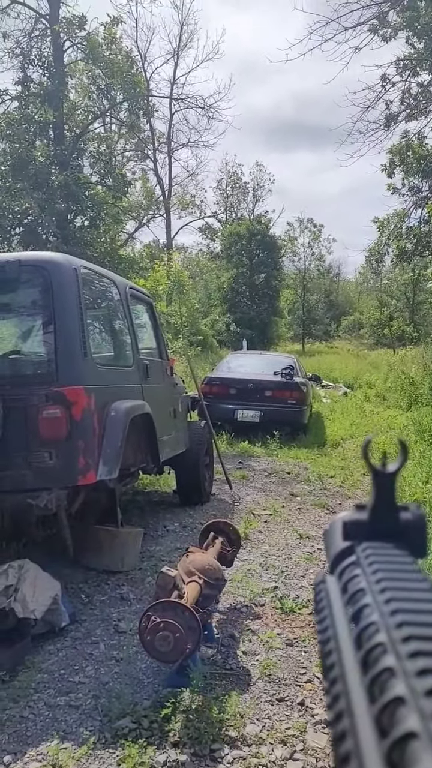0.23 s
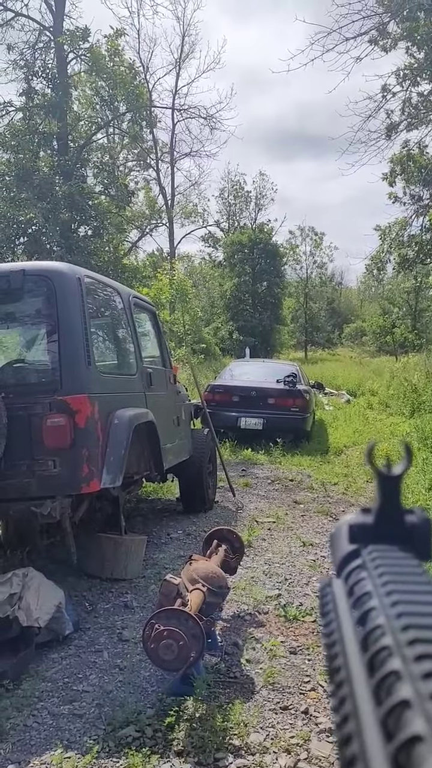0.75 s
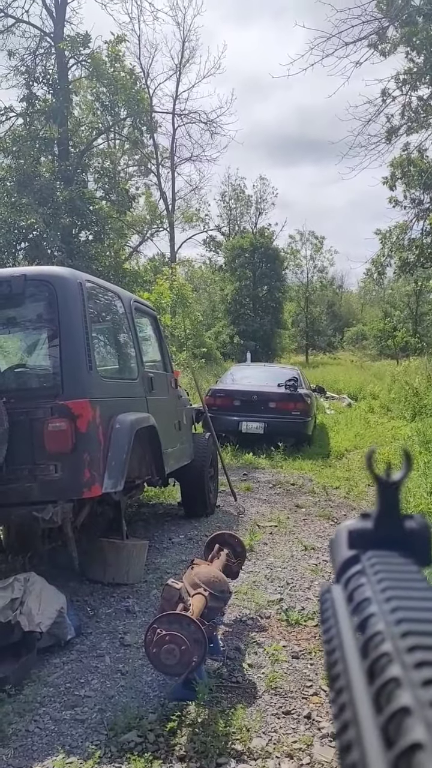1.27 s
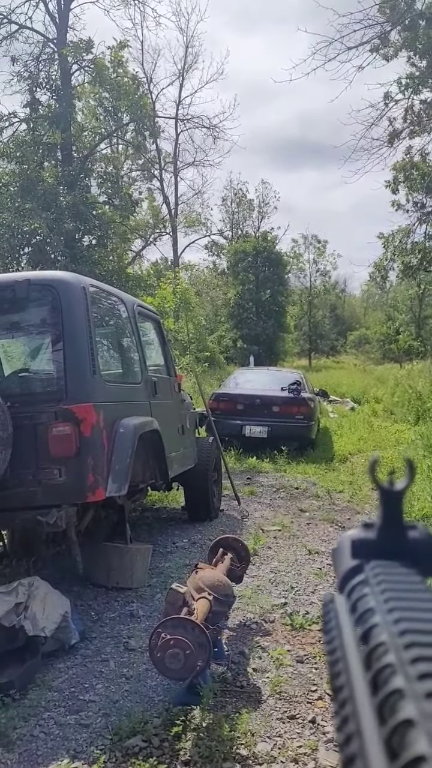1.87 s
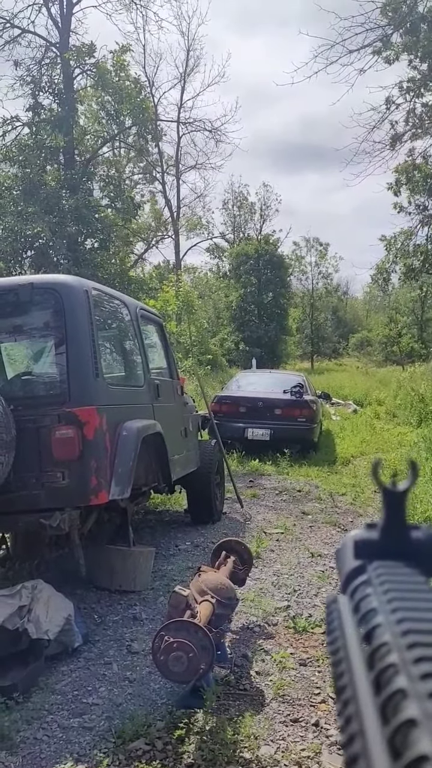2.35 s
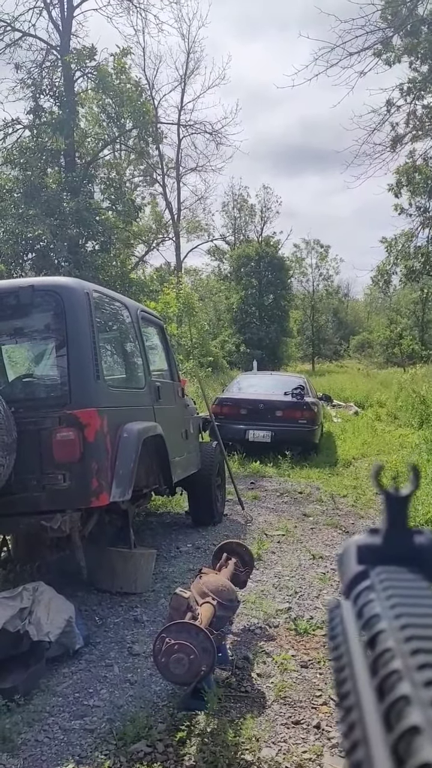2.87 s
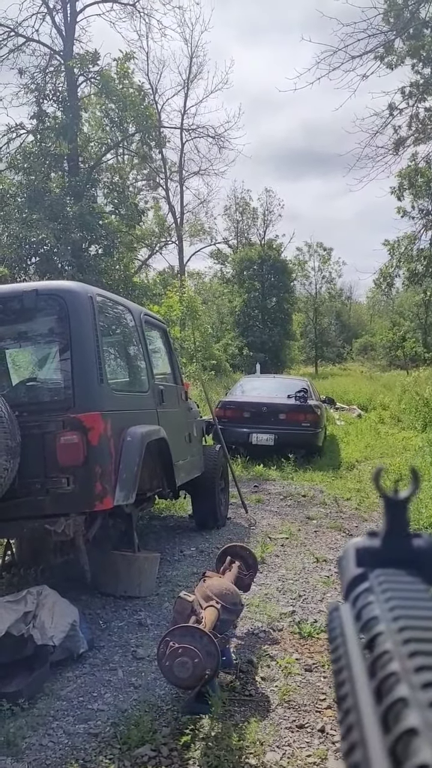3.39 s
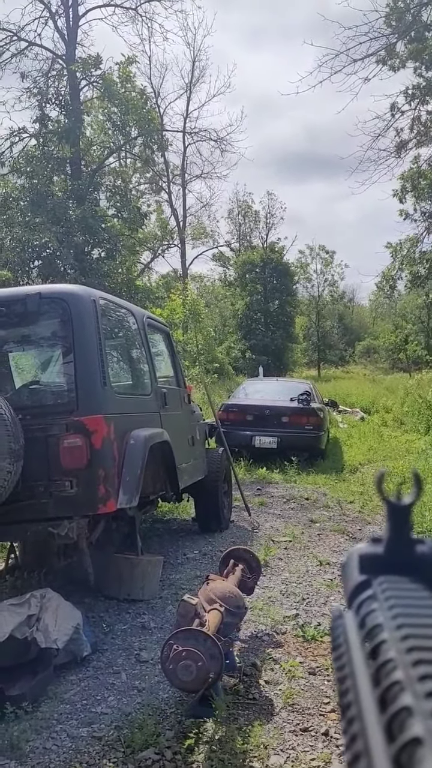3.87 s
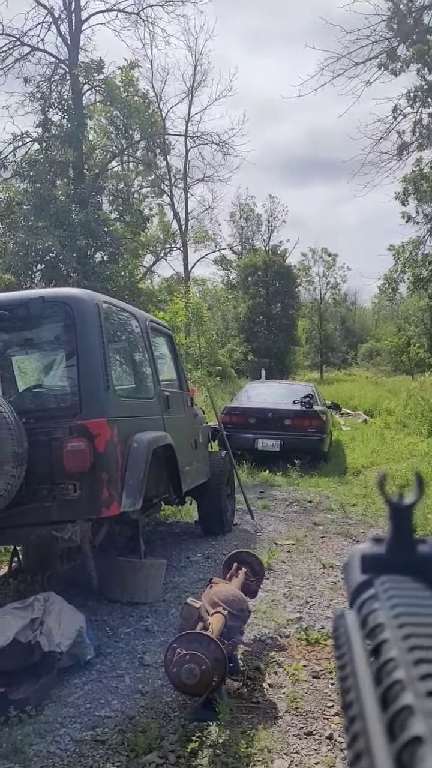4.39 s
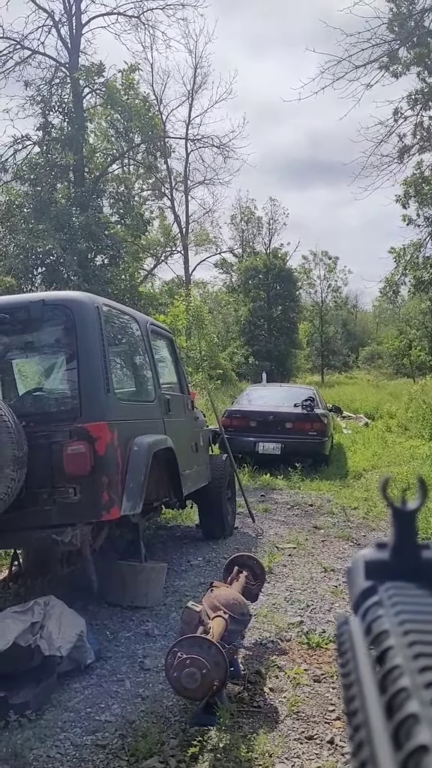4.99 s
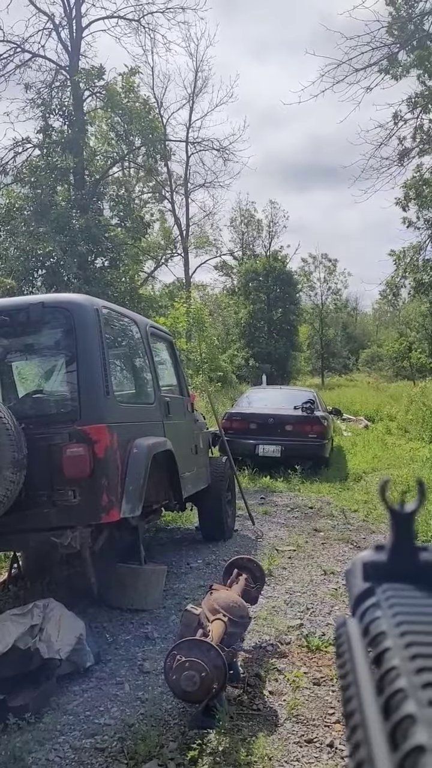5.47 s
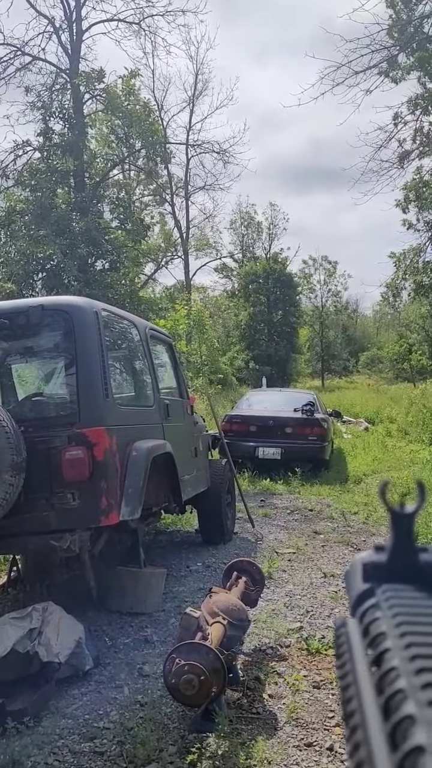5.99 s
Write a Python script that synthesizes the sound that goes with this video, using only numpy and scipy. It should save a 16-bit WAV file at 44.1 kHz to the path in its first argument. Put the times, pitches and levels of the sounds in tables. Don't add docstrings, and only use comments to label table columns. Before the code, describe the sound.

In a quiet yard with faint low hum and leaves, an electric airsoft rifle is handled right beside a phone's microphones. A latch clicks at the very start, then near silence. At 0.4 seconds the motor whirrs up and a dry pop snaps at 0.47; the gears coast down and click. Another single shot comes at 1.04, followed by a brief whirr and sharp click at 1.26. A pair pops at 1.67 and 1.78. From 2.5 to 3.25 a rapid six-shot string chatters, gears grinding and whining between pops. After a pause with tiny ticks, a similar string runs from 3.67 to 4.4, with another shot at 4.52 and latch clatter. From 5.0 to 5.8 six more fire slightly less evenly, then single shots at 5.89 and 6.19. Each pop has a thump, plastic ring and short scattered echo; small wind puffs bump the left side.

```python
import sys
import numpy as np
from scipy import signal
from scipy.fft import rfft, irfft
from scipy.io import wavfile
from scipy.ndimage import uniform_filter1d

SR = 44100
rng = np.random.default_rng(int(sys.argv[2]) if len(sys.argv) > 2 else 0)


def to_wav(s):
    ch = np.atleast_2d(s).T
    pcm = np.round(np.clip(ch, -1, 1) * 32767)
    wavfile.write(sys.argv[1], SR, pcm.astype(np.int16))


def natural_amplitude(level_db):
    exponent = np.asarray(level_db, float) / 20
    return 10 ** exponent


N = 275625
T = np.arange(N) / SR

# start in seconds, peak in dB, thump in dB.
SHOTS = [(0.466, -1.5, -3), (1.0376, -3, 4), (1.6712, -1, -3), (1.7799, -3.5, 3.5), (2.5727, -3, 1),
         (2.6864, -4.5, -6), (2.798, -3.5, -3), (2.9123, -3.5, -2), (3.0241, -3, -2), (3.1329, -3.5, -2),
         (3.7628, -2.5, -4.5), (3.882, -3.5, -10), (3.997, -3.5, -3.5), (4.11, -3, -5.5), (4.2236, -4, -5),
         (4.3358, -3, 2), (4.5189, -4, 1), (5.1006, -3, -1), (5.2075, -5, 0), (5.3168, -4.5, 1.5),
         (5.428, -3.5, -5.5), (5.5418, -5.5, 2.5), (5.676, -5, 2.5), (5.894, -4.5, 1), (6.1853, -4.5, -2)]
# start and end in seconds, rattle at the right port in dB, treble in dB,
# sag while coasting in dB.
PULLS = [(0.382, 0.579, -17, -19, 1), (1.003, 1.168, -15, -16, -17), (1.156, 1.208, -17.5, -18, 6),
         (1.592, 1.887, -17.5, -18.5, -7), (2.509, 3.25, -21.5, -17.5, -6.5),
         (3.667, 4.442, -21.5, -18, -2), (4.45, 4.628, -22, -15, -9), (5.002, 5.791, -23, -17, -6.5),
         (5.781, 5.998, -22.5, -20.5, 2), (6.131, 6.299, -23.5, -16, 2.5)]
SHOT_S = np.array(SHOTS)[:, 0]
POP_S = SHOT_S + 0.0014
GRIP_REST_DB = -4.5


def colour(x, table):
    hz, db = np.transpose(table)
    f = np.arange(x.shape[-1] // 2 + 1) * SR / x.shape[-1] + 1
    gain = natural_amplitude(np.interp(np.log(f), np.log(hz), db))
    return irfft(rfft(x) * gain, x.shape[-1])


def unit(x):
    return x / np.sqrt(np.mean(x ** 2))


def walk(rate):
    hold = int(SR / rate)
    steps = np.repeat(rng.standard_normal(N // hold + 1), hold)
    return 1.46 * uniform_filter1d(steps, hold)[:N]


def ring(x, hz, width):
    return signal.lfilter(*signal.iirpeak(hz, hz / width, SR), x)


def add(out, s, sound):
    i = int(round(s * SR))
    sound, i = sound[:, max(-i, 0):], max(i, 0)
    out[:, i:i + sound.shape[1]] += sound[:, :N - i]


def grip():
    # time in seconds, left minus right in dB.
    shading = [(0, -3), (1.3, -4), (2.5, -6), (4.2, -3.5), (4.26, -11.5), (5.0, -12.5), (6.25, -12)]
    return np.interp(T, *np.transpose(shading))


def ports(near, other, alike, pan_db):
    lag = 14
    alike = np.clip(alike, 0, 1)
    left = alike * np.roll(near, lag) + np.sqrt(1 - alike ** 2) * other
    return np.array([left * natural_amplitude(pan_db), near])


def shots():
    # time from the pop in ms, pitch in Hz, length in ms, left gain, right gain.
    puffs = [(-7.9, 200, .8, -.07, -.1), (-6.2, 160, 1.2, .11, .17), (0, 2500, .24, .45, .15),
             (.19, 2550, .3, -.2, -.75), (0, 6500, .07, .46, .32), (.45, 5000, .14, -.2, .12),
             (2.25, 1150, .55, -.08, -.36), (3.0, 1100, .7, .15, .03), (7.9, 3000, .15, .2, .02),
             (13.6, 2500, .2, -.12, .16), (18.3, 2600, .5, .05, -.22), (-4.6, 480, 1.2, -.04, -.06),
             (31, 450, .8, .03, .05), (31.5, 1500, .5, .05, .1), (7.5, 830, 2.8, .05, .075),
             (.1, 12000, .05, .16, .12)]
    # pitch in Hz, level in dB, t60 in seconds.
    body_modes = [(67, -31.5, 0.13), (142, -32, 0.082), (270, -44.5, 0.33), (316, -35.5, 0.11),
                  (500, -20, 0.03), (850, -19, 0.04), (980, -24, 0.03), (1300, -16, 0.028)]
    out, ms = np.zeros((2, N)), np.arange(-441, 8000) / SR * 1000
    shade_db = grip()
    late = np.maximum(ms - 1.6, 0) / 1000
    for (s, db, thump_db), pop_s, vary in zip(SHOTS, POP_S, rng.standard_normal((len(SHOTS), 20))):
        pop = 0
        for (at, hz, length, left, right), v in zip(puffs, vary):
            wave = np.cos(2 * np.pi * hz * (ms - at) / 1000) * np.exp(-((ms - at) / length) ** 2)
            early_db = thump_db if at < -1 else 0
            pop = pop + natural_amplitude(0.7 * v + early_db) * np.outer([left, right], wave)
        body = 0
        for (hz, mode_db, t60), v in zip(body_modes, vary[10:]):
            tone = np.sin(2 * np.pi * hz * (1 + 0.043 * v) * late)
            body = body + natural_amplitude(mode_db + 2 * v) * tone * 1000 ** (-late / t60)
        pop[0] *= natural_amplitude(0.051 * (shade_db[int(s * SR)] - 3.0))
        both = pop + ports(body, np.roll(body, 140), 1.0, -3.0)
        add(out, pop_s - 441 / SR, natural_amplitude(db + 3.5) * both)
    return out


def pulls():
    # seconds after the start, rattle in dB, treble in dB.
    start = [
        (0, -49.5, -6.5),
        (.008, -10.5, -12),
        (.026, 1, -6.5),
        (.07, 0.5, -1),
        (.12, 1, 0),
    ]
    # seconds before the end, rattle in dB, treble in dB.
    stop = [
        (0, -41.5, 4.5),
        (.008, -8.5, -2.5),
        (0.031, 0.5, 0),
    ]
    level_db, treble_db = np.full(N, -90.), np.zeros(N)
    s0, up_db, up_treble = np.transpose(start)
    s1, down_db, down_treble = np.transpose(stop)
    for t0, t1, db, high_db, sag_db in PULLS:
        on = (T >= t0) & (T < t1)
        t, last = T[on], max(SHOT_S[SHOT_S < t1][-1], t0)
        edges_db = np.interp(t - t0, s0, up_db) + np.interp(t1 - t, s1, down_db)
        level_db[on] = db + edges_db + np.interp(t, [last, t1], [0, sag_db])
        treble_db[on] = high_db + np.interp(t - t0, s0, up_treble) + np.interp(t1 - t, s1, down_treble)
    cupped_db = GRIP_REST_DB - grip()
    return level_db + 0.99 * cupped_db, treble_db - 0.62 * cupped_db


def spins():
    # start in seconds, start, middle and end in Hz, level in dB.
    windups = [(.405, 850, 1140, 1130, -22), (1.173, 860, 900, 870, -27), (1.603, 820, 1150, 1210, -23),
               (2.533, 860, 1030, 1050, -25), (3.683, 830, 1200, 1120, -25), (4.483, 900, 1030, 1060, -22),
               (5.016, 820, 1310, 1240, -21.5), (5.583, 1330, 1430, 1150, -23),
               (5.812, 880, 1370, 1330, -22.5), (6.148, 700, 880, 930, -27.5)]
    # start in seconds, middle and end in Hz, level in dB.
    coasts = [(.49, 1800, 650, -24.5), (1.8, 1300, 850, -29), (4.37, 1300, 600, -31),
              (5.94, 1400, 500, -25)]
    free_hz, slack_s, stall_s, coast_slack_s = 1900, .008, .02, .014
    ends = np.array(PULLS)[:, 1]
    after = lambda times, s: times[times > s][0]
    arcs = []
    for s, *arc in windups:
        arcs.append((s, min(after(POP_S, s) - slack_s, after(ends, s) - stall_s), *arc))
    for s, *arc in coasts:
        arcs.append((s, after(ends, s) - coast_slack_s, free_hz, *arc))
    return arcs


def strokes(level_db):
    # seconds after a shot, seconds before the next, start, middle and end in Hz, dB over the rattle.
    stroke = (.028, .007, 1900, 1690, 1280, -6.5)
    after_s, before_s, start_hz, middle_hz, end_hz, over_db = stroke
    usual_s, law = .113, 1.4
    arcs = []
    for a, b in zip(POP_S, POP_S[1:]):
        if b - a < 1 / 8:
            lift = (usual_s / (b - a)) ** law
            db = over_db + level_db[int((a + b) / 2 * SR)]
            arcs.append((a + after_s, b - before_s, start_hz, middle_hz * lift, end_hz * lift, db))
    return arcs


def whine(level_db):
    # pitch in Hz, width in Hz, gain.
    overtone_panels = [(2030, 140, 4), (3200, 200, .7), (4300, 200, 3.5)]
    mesh, overtones, wobble = np.zeros(N), np.zeros(N), 1 + .008 * walk(150)
    for t0, t1, a, m, b, db in spins() + strokes(level_db):
        i = slice(int(t0 * SR), int(t1 * SR))
        u = np.linspace(0, 1, len(wobble[i]))
        u = u ** (.7 if m > a + 200 else 1)
        hz = a + (4 * m - 3 * a - b) * u + 2 * (a + b - 2 * m) * u ** 2
        turn = 2 * np.pi * np.cumsum(hz * wobble[i]) / SR
        load = natural_amplitude(db) * np.sin(np.pi * u) ** .3 * (.6 + .85 * u)
        mesh[i] += load * np.sin(turn)
        upper = .14 * np.sin(2 * turn) + .16 * u * np.sin(3 * turn) + .05 * np.sin(4 * turn)
        overtones[i] += load * upper
    swells = 0
    for hz, width, gain in overtone_panels:
        swells = swells + gain * natural_amplitude(2.3 * walk(110)) * ring(overtones, hz, width)
    return (mesh + overtones + swells) * natural_amplitude(1.8 * walk(70))


def teeth():
    # pitch in Hz, width in Hz, level in dB.
    case_panels = [(1404, 100, -1.5), (1948, 110, 3), (2530, 38, 0.5), (2960, 42, 5), (3416, 25, 1.5),
                   (4090, 25, -3.5), (4370, 39, -1.5), (4850, 260, -11.5), (5190, 510, -5)]
    # frequency in Hz, level in dB per Hz.
    rattle_colour = [(59, -49), (100, -18), (621, -17), (872, -6), (991, -10.5), (1310, -10), (1650, -8),
                     (2470, -2), (2690, -5), (4290, -7.5), (8640, -14), (12400, -18.5), (16000, -21.5)]
    knocks = rng.standard_normal(N) * natural_amplitude(2.64 * walk(900) + 1.0 * walk(130))
    panels = 0
    for hz, width, db in case_panels:
        rung = ring(knocks * natural_amplitude(3.8 * walk(130)), hz, width)
        shifted = np.arange(N) + np.cumsum(.025 * walk(45))
        panels = panels + natural_amplitude(db) * np.interp(shifted, np.arange(N), rung)
    rattle = colour(natural_amplitude(-3) * knocks + panels, rattle_colour)
    low = colour(rattle, [(7000, 0), (9000, -40)])
    high = sum(natural_amplitude(2.45 * walk(45)) * ring(rattle - low, hz, 1700) for hz in (7200, 11600, 13200, 15100))
    return unit(low), unit(high * natural_amplitude(1.2 * walk(300)))


def gearbox():
    # time after the pop in ms, level in dB, extra treble in dB, hum of the spring guide in dB.
    cycle = [(0, 8, 1, -7), (10.7, 0.5, 0.5, -3.5), (14.7, 7.5, 4.5, -1.5), (28, 3, 1.5, -23),
             (28.2, 5, 3, -13), (42, 4.5, 1, 1), (59, 3.5, 1.5, 4.5), (90.5, -1.5, -3, -6),
             (123, 3, -2, 0.5)]
    # pitch in Hz, width in Hz, level in dB.
    guide = (850, 115, -17)
    # pitch in Hz, width in Hz, level in dB.
    sector = (1800, 450, -10)
    # time after the pop in ms, level in dB.
    grind_cycle = [
        (24, -28),
        (31, 0.5),
        (46, -4.5),
        (66, -18),
        (80, -31.5),
    ]
    # frequency in Hz, level in dB.
    left_path = [(1500, 2), (2100, -3.5), (3000, -4), (4200, 1), (7000, -1)]
    release_ms, release_db = 2.4, -1.5
    left_flare = 1.5
    level_db, treble_db = pulls()
    shade_db = grip()
    coming = np.searchsorted(POP_S, T)
    since = 1000 * (T - POP_S[np.maximum(coming - 1, 0)])
    until = 1000 * np.abs(POP_S[np.minimum(coming, len(POP_S) - 1)] - T)
    ms, swell_db, flare_db, hum_db = np.transpose(cycle)
    swell_db = np.interp(since, ms, swell_db, 0, 0)
    flare_db = np.interp(since, ms, flare_db, 0, 0)
    hum_db = np.interp(since, ms, hum_db, -4, -7)
    gain = natural_amplitude(level_db + np.interp(until, [release_ms, release_ms + 2], [release_db, 0]))
    (low, high), (low_left, high_left) = teeth(), teeth()
    hum_gain = natural_amplitude(guide[2] + hum_db + 2.2 * walk(56) + 0.56 * (shade_db - GRIP_REST_DB))
    hum = hum_gain * unit(ring(rng.standard_normal(N), *guide[:2]))
    grind_gain = natural_amplitude(sector[2] + np.interp(since, *np.transpose(grind_cycle)) + 3.4 * walk(160))
    grind = grind_gain * unit(ring(rng.standard_normal(N), *sector[:2]))
    tone = whine(level_db) + gain * (hum + grind)
    rattle = natural_amplitude(swell_db - 8.0) * ports(low, colour(low_left, left_path), 0.03, shade_db)
    left_high = (0.35 * high + 0.74 * high_left) * natural_amplitude((left_flare - 1) * flare_db - 1.0)
    hiss = natural_amplitude(treble_db + flare_db + 1.0) * np.array([left_high, high])
    return gain * (rattle + hiss) + ports(tone, tone, 0.94, 0.87 * shade_db)


def clicks():
    # time in seconds, peak in dB, ring in Hz, treble in dB.
    presses = [(0.363, -40, 3420, -21), (.384, -30.5, 3010, -9.5), (.999, -26.5, 4000, -19),
               (1.157, -32, 900, -22), (1.164, -18, 1970, -6), (1.171, -21.5, 4020, -12.5),
               (1.186, -23.5, 4000, -10.5), (1.586, -22.5, 2030, -23), (2.506, -26.5, 1830, -21),
               (3.666, -28, 1930, -21), (4.454, -10, 2870, -14.5), (4.997, -20, 1920, -26),
               (5.7905, -11, 2635, -14), (6.13, -20.5, 2540, -20)]
    # time in seconds, peak in dB, ring in Hz, treble in dB, own low end in dB.
    latches = [(-.0025, -17.5, 4200, -14.5, -9.5), (.582, -14, 5430, -15.5, -15.5),
               (1.254, -13.5, 4170, -14.5, -17.5), (1.8994, -12, 4240, -7.5, -11.5),
               (3.2589, -18.5, 3490, 0, -19.5), (4.608, -20.5, 3060, -15.5, -11.5),
               (4.623, -11, 5070, -20.5, -11.5), (6.017, -8, 4850, -11.5, -13.5)]
    # time in seconds, peak in dB, ring in Hz, treble in dB.
    part_knocks = [(.013, -19, 3120, -2), (.027, -31.5, 1900, -6), (0.481, -18, 2950, -16.5),
                   (0.494, -19, 2790, -17.5), (0.566, -29, 3900, -19), (.592, -13.5, 3190, -3),
                   (1.195, -19.5, 4090, -27), (1.261, -25, 3000, -16), (1.276, -31, 3960, -14),
                   (1.282, -27, 1000, -14.5), (1.908, -18.5, 3540, 2), (3.272, -28, 3010, -6),
                   (1.92, -29, 3500, -11), (6.024, -18, 2300, -15), (6.049, -32, 5000, -15),
                   (4.237, -12, 3000, -14), (4.35, -20, 2510, -6), (5.234, -14, 2000, -14),
                   (4.5389, -23, 3300, -22), (4.6441, -16, 2340, -1.5), (4.661, -27.5, 2100, -4),
                   (4.709, -40.5, 1590, -24), (4.253, -12, 2600, -16), (4.463, -12.5, 2100, -10),
                   (5.013, -22.5, 3560, -14), (5.765, -27, 900, -21), (5.802, -22.5, 5000, 4),
                   (5.908, -19, 2400, -17), (5.931, -16, 2020, -16), (5.947, -22, 1950, -22.5),
                   (6.216, -19, 1900, -17), (6.035, -14, 1780, -15)]
    # time in seconds, peak in dB, ring in Hz, treble in dB.
    ticks = [(0.231, -61, 5470, -22), (0.239, -53, 2220, -18.5), (.317, -66, 4020, -29),
             (.934, -58.5, 1740, -30), (.964, -61.5, 1570, -33), (1.334, -58, 6000, -20),
             (1.385, -62.5, 6000, -22), (1.404, -61.5, 6050, -18.5), (1.567, -53, 7000, -11),
             (3.588, -58.5, 4890, -28), (3.617, -59, 6000, -10.5), (3.654, -59.5, 5000, -7),
             (.784, -50, 2240, -13.5), (0.832, -46, 7100, -3), (1.462, -48.5, 3500, -7.5),
             (1.515, -46, 2270, -30), (2.183, -60, 1516, -26), (2.23, -59, 1580, -26),
             (2.262, -60, 2070, -7.5), (2.28, -37, 4930, -21.5), (2.291, -40.5, 2030, -35),
             (2.419, -45.5, 1980, -43), (2.454, -48, 1880, -24), (3.441, -44, 5530, -15.5),
             (3.455, -49.5, 2390, -14), (3.595, -51.5, 4520, -23), (3.626, -43, 2270, -21.5),
             (4.89, -51, 3000, -36), (4.902, -41, 1900, -35.5), (4.94, -34.5, 1610, -39),
             (4.948, -68, 4000, -18)]
    # rise in seconds, t60 in seconds, low end in dB.
    kinds = [
        (.0035, 0.05, -9.5),
        (.0028, 0.031, -14),
        (.0028, 0.04, -19),
        (.0028, 0.026, -20),
    ]
    # frequency in Hz, level in dB per Hz.
    click_colour = [(120, -42.5), (200, 1), (601, -2.5), (851, -9.5), (1910, -9.5), (3070, -11.5),
                    (4200, -10.5), (8740, -15.5), (11900, -10.5), (14300, -10.5), (16000, -21.5)]
    # pitch in Hz, width in Hz, gain.
    clack = (1680, 1000, 0.38)
    out, t, pan_db = np.zeros((2, N)), np.arange(4410) / SR, grip()
    for events, (rise, t60, kind_low_db) in zip((presses, latches, part_knocks, ticks), kinds):
        shape = np.minimum(t / rise, 1) ** 3 * 1000 ** (-np.maximum(t - rise, 0) / max(t60, .005))
        for s, db, hz, treble_db, *own_low in events:
            low_db = own_low[0] if own_low else kind_low_db
            grit = colour(rng.standard_normal((2, len(t))), click_colour)
            grit = grit + 2.2 * ring(grit, hz, hz / 5) + 3 * ring(grit, 870, 150)
            grit = grit + clack[2] * ring(grit, *clack[:2])
            grit = colour(grit, [(250, low_db + 1.0), (700, low_db + 7.0), (1000, low_db + 9.0),
                                 (1600, 0.0086), (7000, 0.0033), (10000, treble_db + 8.0)])
            both = ports(*unit(grit), 0.089, 0.76 * pan_db[int(s * SR)])
            add(out, s + 0.0011 + .0028 - rise, natural_amplitude(db - 2.5) * shape * both)
    return out


def snaps():
    # time in seconds, tongue in dB, tongue in Hz, frame in Hz, frame in dB.
    latch_snaps = [(0.5855, -27, 5600, 1900, -30), (1.258, -6.5, 4200, 855, -18),
                   (1.904, -13.5, 4100, 856, -19), (4.627, -19.5, 5100, 1910, -22),
                   (6.0215, -13, 5000, 2097, -13.5)]
    swell_s, tongue_t60_s, fall = .0016, 0.013, .45
    frame_late_s, frame_t60_s, stock_hz = 0.0021, .03, 1420
    out, t = np.zeros((2, N)), np.arange(-441, 2600) / SR
    fade = lambda t, t60: np.exp(-(np.minimum(t, 0) / swell_s) ** 2) * 1000 ** (-np.maximum(t, 0) / t60)
    glide = 1 + fall * np.clip(-t / (2 * swell_s), 0, 1)
    for s, db, hz, frame_hz, frame_db in latch_snaps:
        rough = rng.standard_normal((2, len(t)))
        chatter = natural_amplitude(3.0 * unit(uniform_filter1d(rough, size=24)))
        tongue = np.sin(2 * np.pi * hz * np.cumsum(glide) / SR) * chatter[0]
        tongue = natural_amplitude(db) * fade(t, tongue_t60_s) * tongue
        frame = np.sin(2 * np.pi * frame_hz * t) + .6 * np.sin(2 * np.pi * stock_hz * t)
        frame = natural_amplitude(frame_db) * fade(t - frame_late_s, frame_t60_s) * frame * chatter[1]
        add(out, s - 441 / SR, ports(tongue, -tongue, 1.0, -4.0) + np.outer([.7, 1], frame))
    return out


def tail(gun):
    t60_s, tail_db = 0.33, -16
    t = np.arange(SR // 2) / SR
    echo = colour(rng.standard_normal((2, len(t))), [(300, -2.0), (870, -10.0), (2000, -12.5), (12000, -5.0)])
    echo = echo * 1000 ** (-t / t60_s) * (t > .008)
    echo = echo / np.sqrt(np.sum(echo ** 2) / 2)
    return natural_amplitude(tail_db) * signal.fftconvolve(gun, echo, axes=1)[:, :N]


def creaks():
    per_s, level_db, t60_s = 40, -70, 0.014
    knock = (rng.random(N) < per_s / SR) * natural_amplitude(level_db + 3.5 * rng.exponential(size=N).clip(0, 2))
    shape = signal.lfilter([1], [1, -1000 ** (-1 / SR / t60_s)], knock)
    return colour(shape * rng.standard_normal((2, N)),
                  [(1200, -24.5), (2500, 3), (7000, 5.0), (8500, -12.5), (15000, -10.5)])


def wind():
    # time in seconds, level in dB, length in seconds.
    buffets = [(1.542, -50.5, 0.12), (1.812, -41, 0.023), (2.825, -42.5, 0.027), (3.683, -55, 0.046),
               (3.652, -40, .011), (1.933, -43, .03), (2.32, -62.5, 0.046), (4.713, -43.5, 0.052),
               (5.02, -48, 0.049), (5.113, -18.5, 0.01), (5.289, -38, 0.045), (5.342, -29.5, 0.015),
               (5.771, -44, 0.071), (6.037, -39.5, 0.079), (6.199, -26.5, 0.018)]
    push = sum(natural_amplitude(db) * np.exp(-((T - s) / length) ** 2) for s, db, length in buffets)
    air = colour(rng.standard_normal(N), [(20, 3.5), (45, -3.0), (90, -6.5), (300, -32.5), (2000, -77.5)])
    return np.outer([1.4, .1], push * unit(air))


def yard():
    # frequency in Hz, level in dB per Hz.
    yard_colour = [(15, -41), (25, 4), (354, -8.5), (754, -10), (936, -8), (1190, -14), (1700, -18),
                   (2480, -23), (3820, -24), (8830, -31.5), (13200, -43.5), (16000, -49)]
    # time in seconds, level in dB.
    swell = [(.2, -4), (.8, 2.5), (1.4, 0.5), (2.3, -3), (3.5, -1), (4.8, 0), (6.1, -4.5)]
    stirring = natural_amplitude(1.2 * np.array([walk(3.6), walk(5)]))
    mid, side = colour(rng.standard_normal((2, N)), yard_colour) * stirring
    side = colour(side, [(100, -2.5), (1000, -8)])
    return natural_amplitude(-63 + np.interp(T, *np.transpose(swell))) * unit(mid + np.outer([1, -1], side))


def scene():
    gun = shots() + gearbox() + clicks()
    return gun + snaps() + tail(gun) + creaks() + wind() + yard()


def top_cut(x):
    return signal.sosfilt(signal.butter(12, 16840, fs=SR, output="sos"), x)


def record(dry):
    rounded = np.tanh(1.051 * dry)
    mix = colour(rounded, [(15, -38.0), (45, -1.5), (15500, 1.0), (15800, -17.5), (16600, -36.0)])
    return top_cut(mix)


dry = scene()
out = record(dry)
to_wav(out)
```